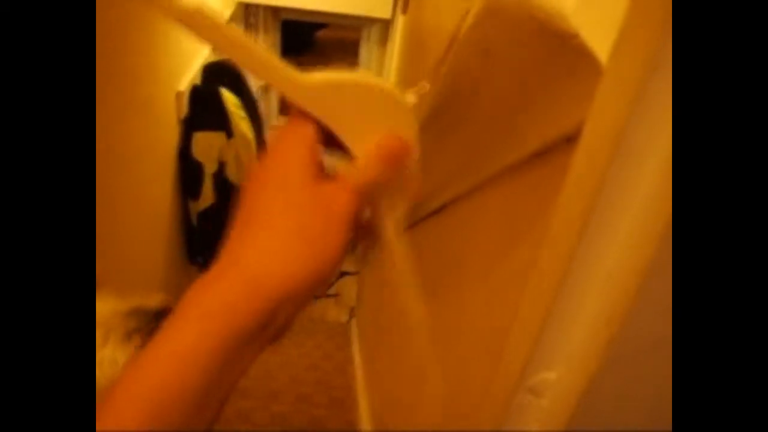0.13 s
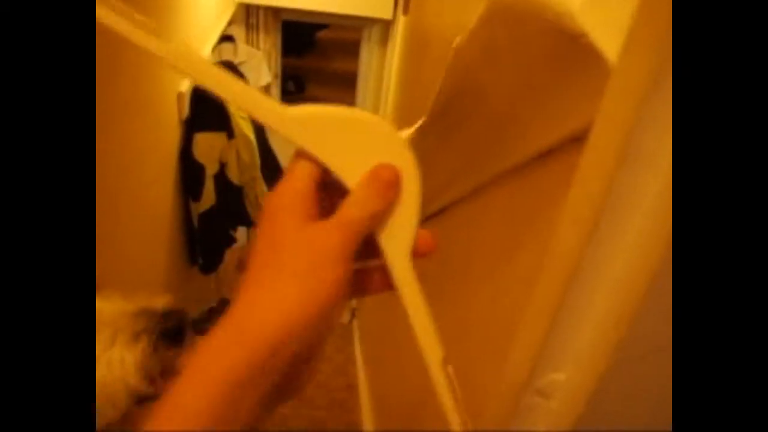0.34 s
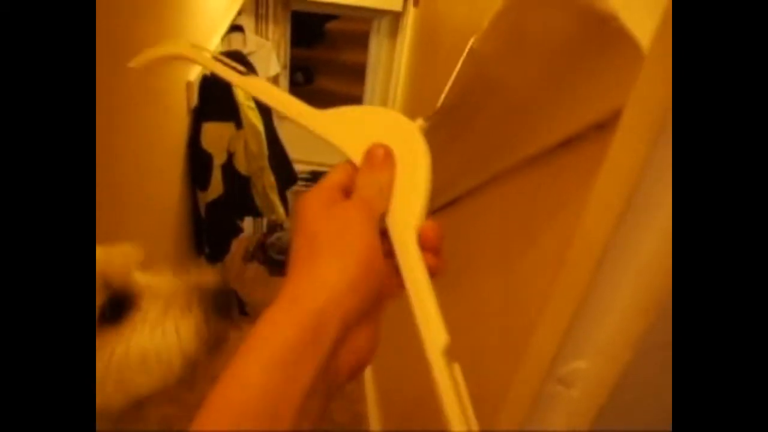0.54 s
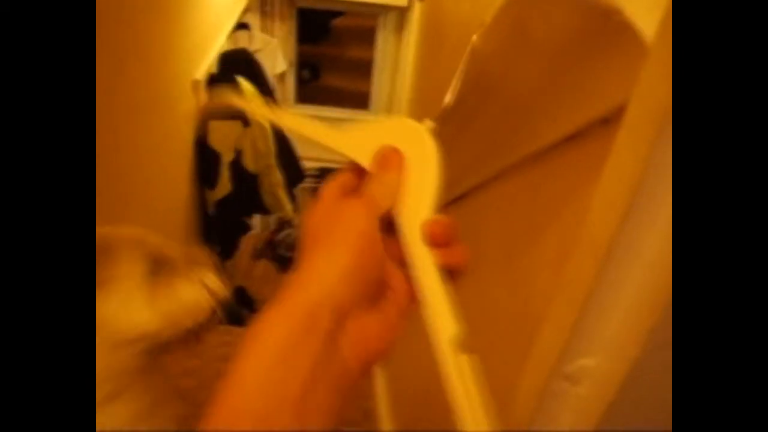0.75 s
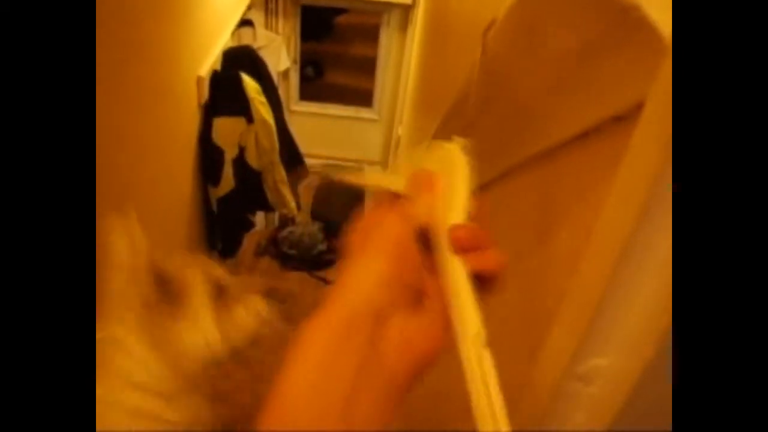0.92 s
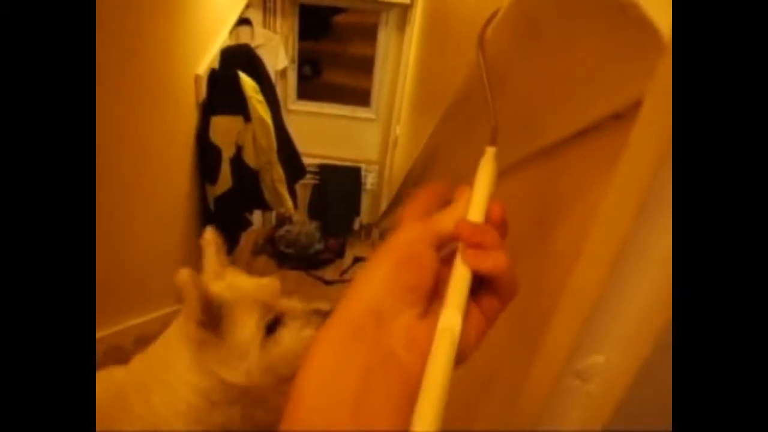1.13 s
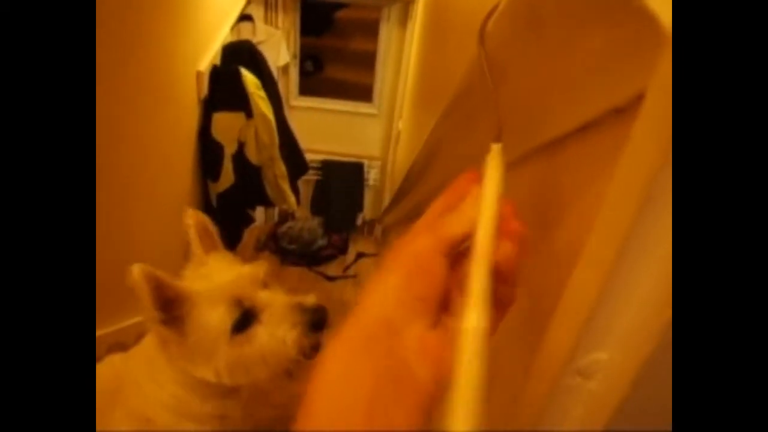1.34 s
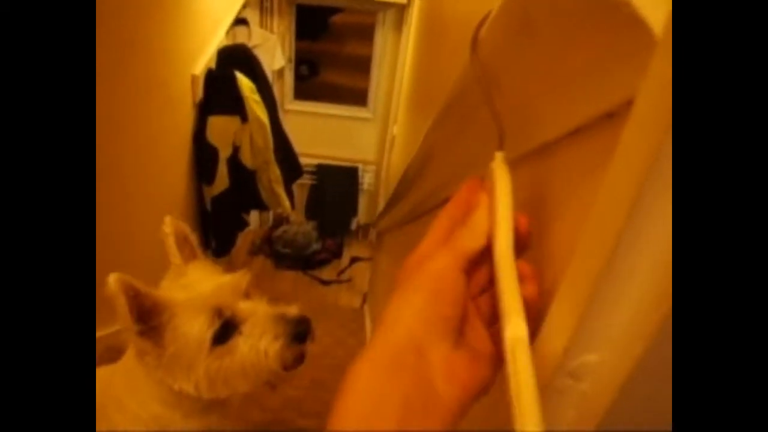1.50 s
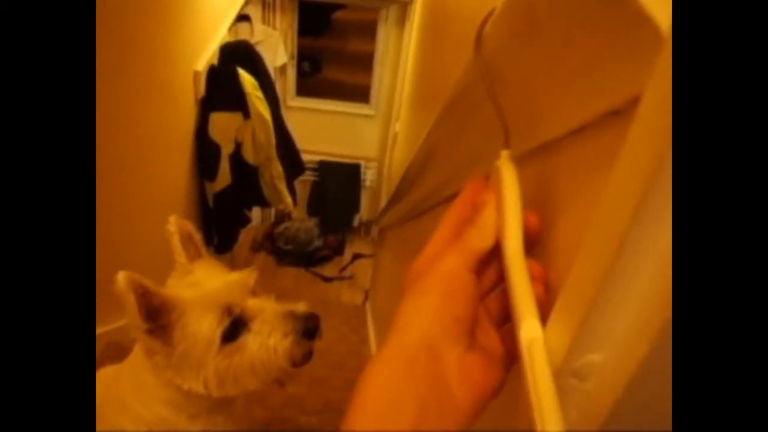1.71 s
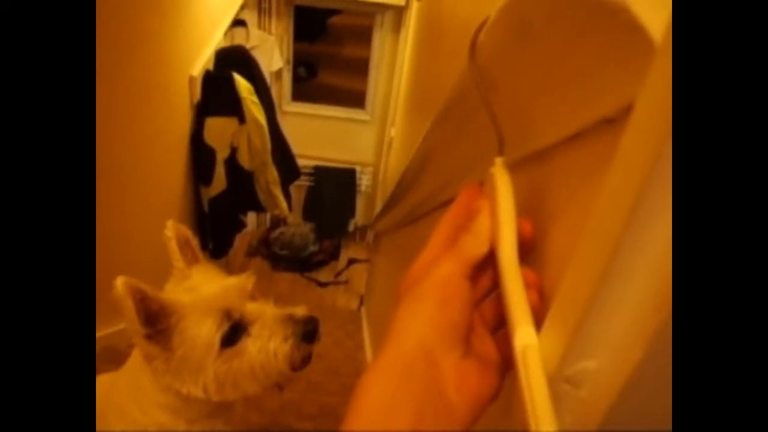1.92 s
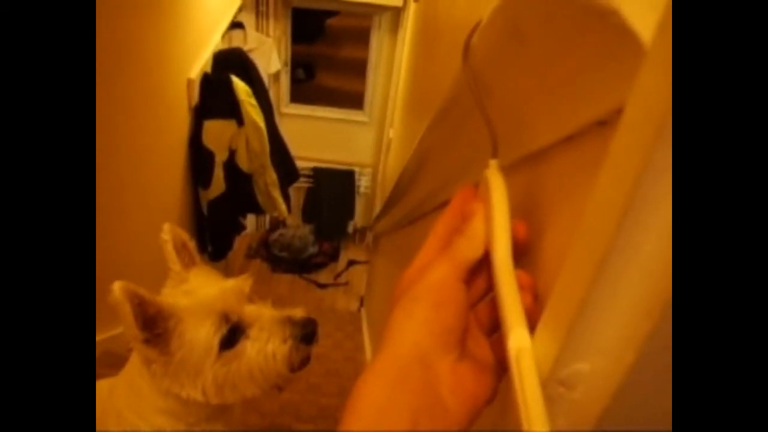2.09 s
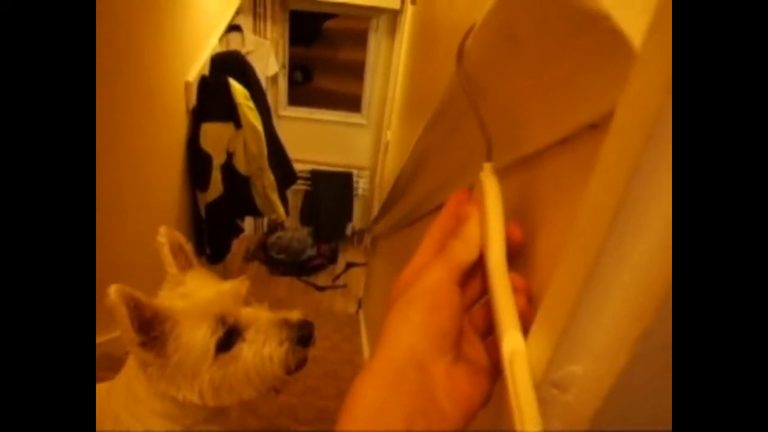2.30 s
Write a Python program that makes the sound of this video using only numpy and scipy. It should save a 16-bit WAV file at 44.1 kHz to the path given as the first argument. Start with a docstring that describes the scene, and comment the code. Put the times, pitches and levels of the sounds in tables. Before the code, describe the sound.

Hard plastic hanger knocks and short rasps, with soft thuds, fading into dull humming room noise

```python
"""A small hallway, one microphone: a plastic clothes hanger with a wire hook is turned in the hand.
It knocks, chatters and rasps at its joint, and its catch clicks: impulses ring its damped modes.
Noise bumps are the soft thuds of hand and paws, dying sines the dry ticks,
swelling and fading sines the faint thin whines.
Behind lie steady and fluttering low noise, hum and the thin whine of a dull recorder that can overload."""
import sys
import numpy as np
from scipy import signal
from scipy.fft import rfft, irfft, next_fast_len
from scipy.io import wavfile

SR = 44100
rng = np.random.default_rng(int(sys.argv[2]) if len(sys.argv) > 2 else 0)


def wav_out(sig):
    """Save sig, one row per channel (or a flat mono array), as 16-bit PCM at SR to the path in sys.argv[1]."""
    wavfile.write(sys.argv[1], SR, np.round(np.clip(np.atleast_2d(sig).T, -1, 1) * 32767).astype(np.int16))


N = 103635
TIME = np.arange(N) / SR  # s
RING_TIME = TIME[:SR // 2]  # every ring and thud is followed for half a second


def from_db(db):
    """Turn decibels into an amplitude gain."""
    return 10 ** (np.asarray(db) / 20)


def rms_one(x):
    """Scale to unit power."""
    return x / np.sqrt(np.mean(x ** 2) + 1e-20)


def dying(t60):
    """Exponential decay by 60 dB in t60 seconds, 1 ms at the shortest."""
    return np.exp(-np.log(1000) * RING_TIME / max(t60, 1e-3))


def swell(start, top, end):
    """Rise in a straight line to 1 and fall again; the three times are put in order first."""
    return np.interp(TIME, np.sort([start, top, end]), [0, 1, 0])


def coloured(x, colour):
    """Causal (minimum-phase) filter with the given spectrum; white noise keeps its power."""
    hz, db = np.transpose(colour)
    size = next_fast_len(len(x) // 2 + SR // 10) * 2
    bin_hz = np.arange(size // 2 + 1) * SR / size
    level_db = np.interp(np.log(bin_hz + 1e-3), np.log(hz), db)
    gain = rms_one(from_db(level_db))
    # folding the cepstrum onto positive times gives the minimum phase
    cepstrum = irfft(np.log(gain))[:size // 2]
    cepstrum[0] /= 2
    response = np.exp(rfft(2 * cepstrum, size))
    return irfft(rfft(x, size) * response)[:len(x)]


def noise(colour, size):
    """Noise of unit power with the given spectrum."""
    return rms_one(coloured(rng.standard_normal(size), colour))


def drift(hz):
    """Random wander of unit power: straight lines between random knots, hz knots a second."""
    knots = rng.standard_normal(1000)
    return rms_one(np.interp(TIME * hz, np.arange(len(knots)), knots))


def add(out, s, sound):
    """Mix a sound in at a time in seconds."""
    i = max(int(s * SR), 0)
    out[i:i + len(sound)] += sound[:N - i]


def background():
    """Steady filtered room noise, a low layer that flutters in level, and steady sines."""
    # spectrum of the steady room noise and hiss: [f/Hz, relative level/dB]
    room_colour = [(15, -11.5), (28, -6), (42, -11.5), (90, 2), (200, -1.5), (400, -5), (750, -17.5),
                   (1000, -20.5), (1500, -19.5), (2400, -24.5), (3000, -22), (3500, -29), (4100, -40.5),
                   (5000, -41), (6200, -70.5)]
    # spectrum of the fluttering layer: [f/Hz, relative level/dB]
    flutter_colour = [(50, -6.5), (140, -5), (300, 3), (520, -8), (740, -2.5), (1000, -17.5), (1500, -17.5),
                      (2500, -29), (4000, -54)]
    # low hum and the recorder's whine: [f/Hz, rms level/dB]
    steady_tones = [(29.8, -53), (60, -54), (90, -55.5), (119.8, -47.5), (149.8, -58.5), (179.7, -52),
                    (3596, -65.5), (4404, -73.5)]
    room_db, flutter_db = -43, -43
    flutter_hz, flutter_depth, uneven_db = 29.3, 0.61, 2

    room = from_db(room_db) * noise(room_colour, N)
    beat = 1 + flutter_depth * np.sin(2 * np.pi * flutter_hz * TIME)
    flutter = rms_one(beat * from_db(uneven_db * drift(hz=88.16)))
    low_layer = from_db(flutter_db) * flutter * noise(flutter_colour, N)
    tones = np.zeros(N)
    for hz, db in steady_tones:
        start_cycle = rng.random()
        tones += from_db(db) * np.sqrt(2) * np.sin(2 * np.pi * (hz * TIME + start_cycle))
    return room + low_layer + tones


def whine():
    """Brief, nearly pure tones, perhaps the dog, that swell, waver a little in pitch and fade."""
    # faint thin whines: [middle t/s, length/s, f/Hz, peak level/dB]
    cries = [(0.136, 0.13, 958, -42.5), (0.794, 0.049, 1033, -40), (1.013, 0.098, 1033, -44)]
    waver = 0.0099  # rms share of the pitch
    cycles = np.cumsum(1 + waver * drift(hz=38)) / SR  # wavering time, in cycles of a 1 Hz tone
    out = np.zeros(N)
    for middle, length, hz, db in cries:
        shape = np.cos(np.pi * np.clip((TIME - middle) / length, -.5, .5))
        out += from_db(db) * shape * np.sin(2 * np.pi * hz * cycles)
    return out


def thuds():
    """Soft, low bumps of hand and paws: noise about one pitch that dies in the hallway."""
    # soft thuds: [t/s, level/dB, f/Hz]
    bumps = [(0.068, -34, 250), (0.21, -29, 230), (0.789, -34, 300), (0.86, -36.5, 330), (0.925, -33, 360),
             (0.999, -30.5, 300), (1.063, -29.5, 106), (1.07, -30, 330), (1.108, -37, 380),
             (1.169, -32, 90), (1.233, -29.5, 300), (1.285, -41.5, 290), (1.652, -42, 290),
             (2.189, -39, 278), (2.271, -48.5, 300)]
    attack_s, t60_s = 0.0074, 0.32
    skirt_db = -11  # slope per octave away from the pitch
    out = np.zeros(N)
    shape = (1 - np.exp(-RING_TIME / attack_s)) * dying(t60_s)
    for s, db, hz in bumps:
        colour = [(hz * 2.0 ** octave, skirt_db * abs(octave)) for octave in (-6, 0, 6)]
        add(out, s, from_db(db) * shape * noise(colour, len(RING_TIME)))
    return out


def ticks():
    """Tiny dry ticks close to the microphone: a sine that dies within a cycle or two."""
    # dry ticks: [t/s, level before damping/dB]
    clicks = [(0.513, -40.5), (0.659, -22.5), (0.7771, -21), (0.859, -32), (0.978, -36), (1.277, -43),
              (1.379, -31)]
    tick_hz, width_hz = 1900, 1200
    out = np.zeros(N)
    click = np.sin(2 * np.pi * tick_hz * RING_TIME) * np.exp(-np.pi * width_hz * RING_TIME)
    for s, db in clicks:
        add(out, s, from_db(db) * click)
    return out


def clatter(colour, decay):
    """Dense resonances as filtered random signs under two decays added in power."""
    first_db, first_t60, second_db, second_t60 = decay  # often a short crack and a longer tail
    first = from_db(first_db) * dying(first_t60)
    second = from_db(second_db) * dying(second_t60)
    shape = np.hypot(first, second)
    return coloured(shape * rng.choice([-1, 1], len(shape)), colour)


def hanger_responses():
    """One contact at each place: damped sine modes, excited by place, over the plastic's clatter."""
    # pitches of the hanger's modes: [f/Hz]
    mode_hz = [666, 710, 899, 974, 1161, 1818, 1912, 1947, 2022, 2056, 2180, 2274, 2363, 2530, 2716, 2829,
               2976, 3034, 3155, 3641, 5975]
    # same order, ring time and excitation by place (rings are capped at longest_ring_s):
    # [t60/s, arm level/dB, hub level/dB, joint level/dB, catch level/dB]
    modes = np.array([ (0.22, -14, -43.5, -34, -26), (0.27, -25.5, -28, -40.5, -13),
                      (0.21, -16, -34.5, -30, -42), (.21, -13, -34.5, -12, -38.5),
                      (0.13, -27, -14, -29.5, -33.5), (0.26, -21.5, -14, -30.5, -38.5),
                      (0.42, -28.5, -17.5, -31.5, -33.5), (.16, -33.5, -34.5, -11.5, -33),
                      (0.27, -20.5, -0.5, -18.5, -27.5), (0.041, -22, 5, -23, -25.5),
                      (0.1, -16.5, -6.5, -3, -30), (.15, -28, -23.5, -9.5, -24),
                      (0.29, -7.5, -24, -22.5, -26), (0.037, -21, -28, -26, -3.5),
                      (.15, -4.5, -29, -23, -14.5), (0.12, -16, -11, -28, -4.5),
                      (.17, -14, -23.5, -18, -16), (0.14, -9, -34, -33.5, -22), (.15, -15, -31, -21.5, -27),
                      (.06, -33.5, -9.5, -27, -26), (0.089, -50.5, -30.5, -31.5, -48)])
    # spectra of the plastic's dense resonances at each place: [f/Hz, relative level/dB]
    arm_colour = [(100, -32), (400, -9.5), (660, 3.5), (950, -1.5), (1250, -11.5), (1700, -7.5),
                  (2300, 6.5), (2520, -7.5), (2750, 0.5), (3200, 0.5), (3700, -19.5), (4350, -25),
                  (4900, -12), (5450, -25), (6000, -27.5)]
    hub_colour = [(100, -34.5), (500, -8), (1100, -4), (1400, -14.5), (1700, -10.5), (2050, 8.5),
                  (2500, -7), (2800, -7), (3200, 0.5), (3400, -44.5), (3650, -17), (4100, -18.5),
                  (5100, -22.5), (5500, -26), (6000, -37.5)]
    joint_colour = [(100, -22), (500, -8.5), (980, -2.5), (1350, -11.5), (1700, -14.5), (2100, 6.5),
                    (2550, -10.5), (2950, -9), (3400, -25.5), (3650, -25.5), (4500, -40), (5000, -23),
                    (5450, -31.5), (5900, -36)]
    catch_colour = [(200, -34.5), (900, -11), (1500, -11.5), (2000, -4), (2500, -0.5), (2900, 5),
                    (3200, -17.5), (4100, -22.5), (4800, -25), (5200, -12.5), (5700, -34.5), (6200, -34)]
    finger_colour = [(200, -3), (1000, 2), (1400, -3.5), (1800, 1.5), (2200, 6), (2600, 2.5), (3100, 0.5),
                     (3600, -20.5), (4300, -31), (5000, -15.5), (5400, -26.5), (5900, -32.5)]
    # how they die (a t60 under 1 ms counts as 1 ms):
    # [first level/dB, first t60/s, second level/dB, second t60/s]
    arm_decay = (7.5, 0.0336, -1.5, 0.19)
    hub_decay = (-0.5, 0.1217, -6.5, 0.0253)
    joint_decay = (6, -1.17, -7.5, 0.33)
    catch_decay = (1, 0.053, -11, 0.3)
    finger_decay = (-0.5, 0.2, -10.5, 0.37)
    build_s, longest_ring_s = .0007, .28

    rings = []
    for k, (hz, t60) in enumerate(zip(mode_hz, modes[:, 0])):
        sign = (-1) ** (k // 2)  # neighbouring pairs start in opposite directions
        ring = np.sin(2 * np.pi * hz * RING_TIME) * dying(min(t60, longest_ring_s))
        rings.append(sign * ring)
    build = 1 - np.exp(-RING_TIME / build_s)
    arm, hub, joint, catch = from_db(modes[:, 1:]).T @ np.array(rings) * build
    return {"arm": arm + clatter(arm_colour, arm_decay),
            "hub": hub + clatter(hub_colour, hub_decay),
            "joint": joint + clatter(joint_colour, joint_decay),
            "catch": catch + clatter(catch_colour, catch_decay),
            "finger": clatter(finger_colour, finger_decay)}


def hanger():
    """Single knocks, and rubs made of many small slips, set the hanger ringing."""
    # knocks and the bounces that follow: [t/s, level/dB, place]
    hits = [(0.0005, -30, "arm"), (0.1853, -18.5, "arm"), (0.2704, -18.5, "joint"), (0.2714, -9, "hub"),
            (0.3022, -23, "hub"), (0.3030, -23.5, "catch"), (0.3123, -23, "catch"),
            (0.3493, -28.5, "joint"), (0.5540, -31, "hub"), (0.5903, -24, "joint"),
            (0.5991, -18.5, "joint"), (1.2134, -26, "catch"), (1.3283, -43.5, "catch"),
            (1.4763, -42.5, "catch")]
    # the arm chatters, the joint rasps, fingers slide on the plastic:
    # [start t/s, strongest t/s, end t/s, level/dB, place]
    rubs = [(0.185, 0.197, 0.23, -17, "arm"), (0.54, 0.547, 0.54, -21.5, "joint"),
            (0.548, 0.578, 0.62, -18.5, "joint"), (0.486, 0.5, 0.5, -42.5, "finger"),
            (0.781, 0.793, 0.82, -36, "finger"), (0.806, 0.843, 0.879, -30, "finger"),
            (0.954, 1.014, 1.062, -39, "finger"), (1.025, 1.036, 1.062, -35.5, "finger"),
            (1.068, 1.105, 1.17, -47.5, "finger"), (1.22, 1.248, 1.395, -40.5, "finger")]
    slips_per_s, slip_spread_db = 1000, 5.5
    response = hanger_responses()
    out = np.zeros(N)
    for s, db, place in hits:
        add(out, s, from_db(db) * response[place])
    for start, top, end, db, place in rubs:
        happens = rng.random(N) < slips_per_s / SR
        strength = from_db(slip_spread_db * rng.uniform(-2.1, 1, N))
        slips = rms_one(happens * strength * rng.choice([-1, 1], N))
        body = response[place] / np.linalg.norm(response[place])
        rub = signal.fftconvolve(slips * swell(start, top, end), body)[:N]
        out += from_db(db) * rub
    return out


def scene():
    """Everything at one microphone."""
    return (background() + whine() + thuds() + ticks() + hanger())[None]


def record(dry):
    """A dull recorder: the treble is cut, peaks past its limit clip, a trace of hiss is added."""
    treble_edge_hz, cutoff_hz = 6070, 15700
    overload, hiss_db = .95, -100  # clipping amplitude; hiss level ahead of the last low-pass
    treble_cut = signal.butter(N=28, Wn=treble_edge_hz, fs=SR, output="sos")
    dull = signal.sosfilt(treble_cut, dry)
    clipped = np.clip(dull, -overload, overload)
    hissing = clipped + from_db(hiss_db) * rng.standard_normal(dry.shape)
    return signal.sosfilt(signal.butter(14, cutoff_hz, fs=SR, output="sos"), hissing)


dry = scene()
out = record(dry)
wav_out(out)
```